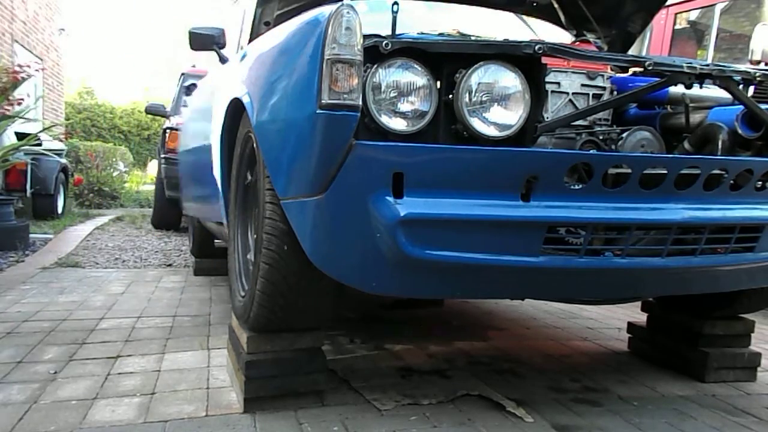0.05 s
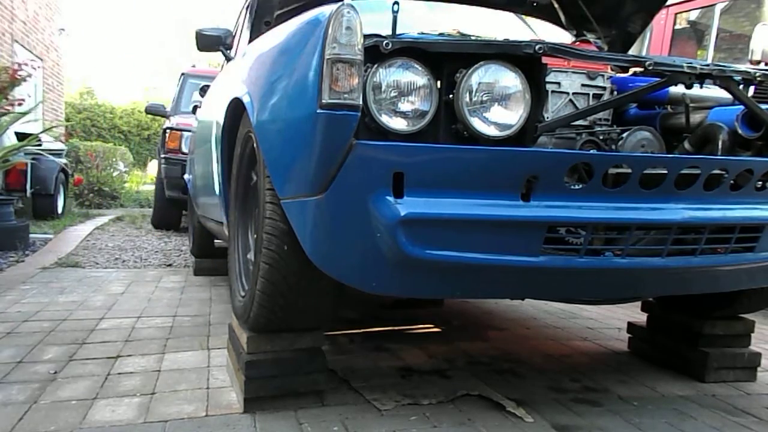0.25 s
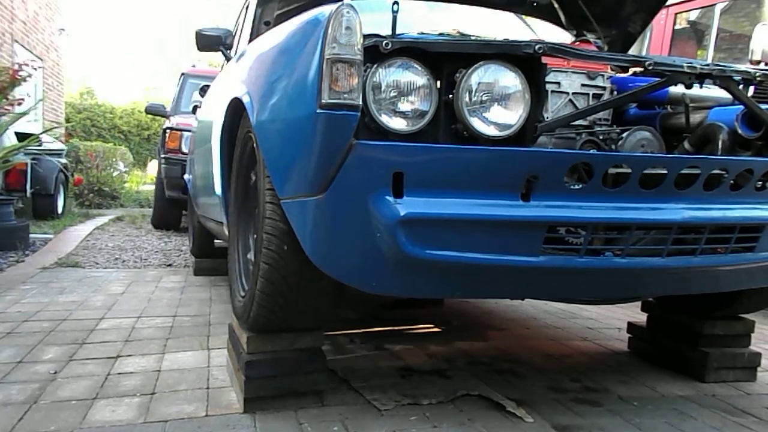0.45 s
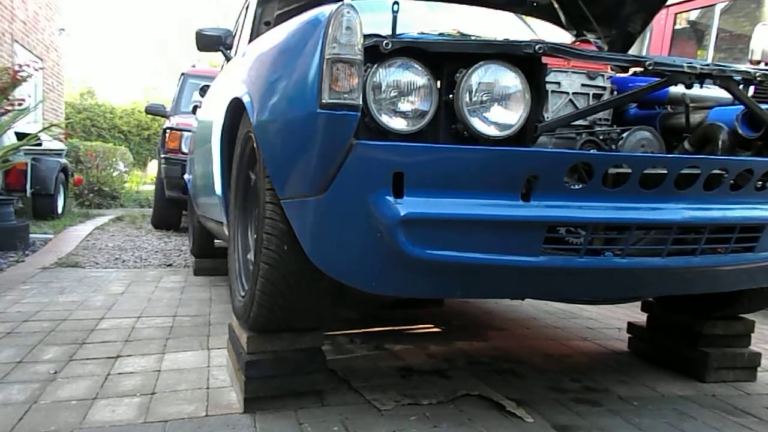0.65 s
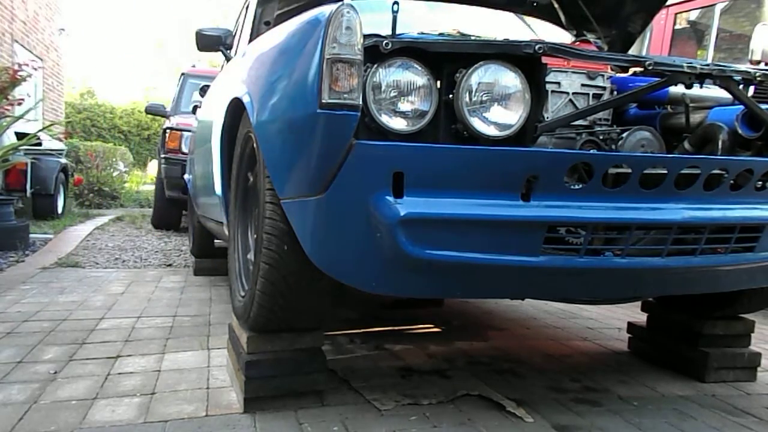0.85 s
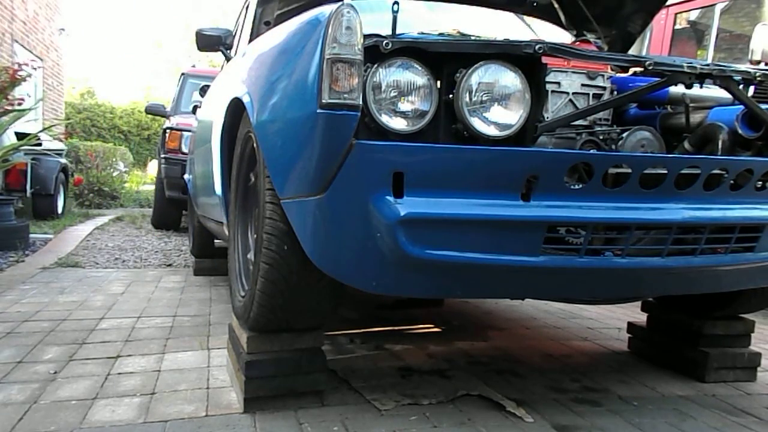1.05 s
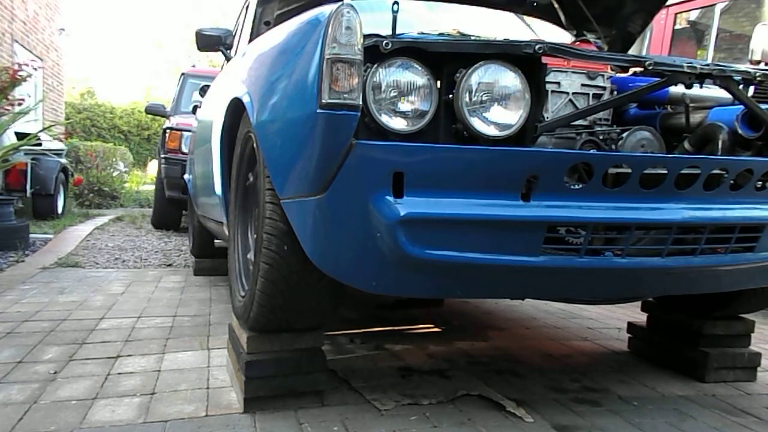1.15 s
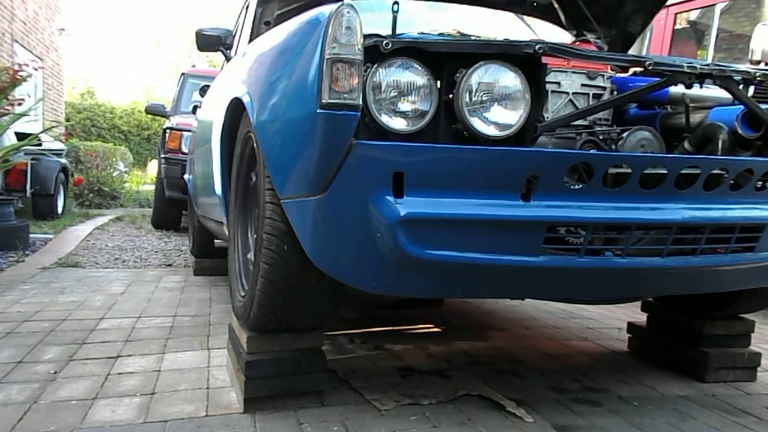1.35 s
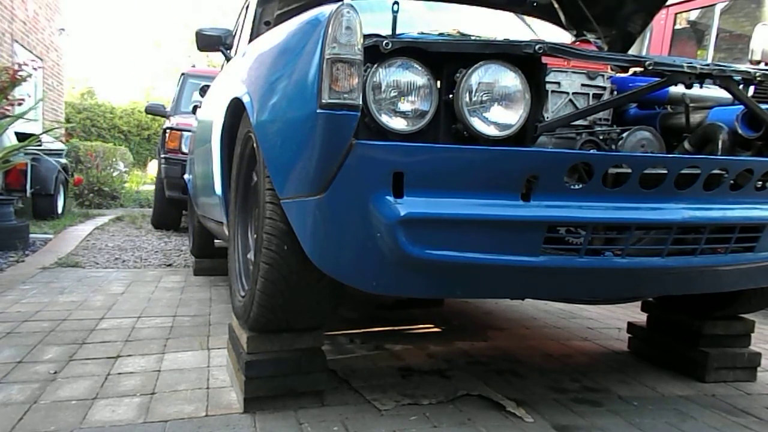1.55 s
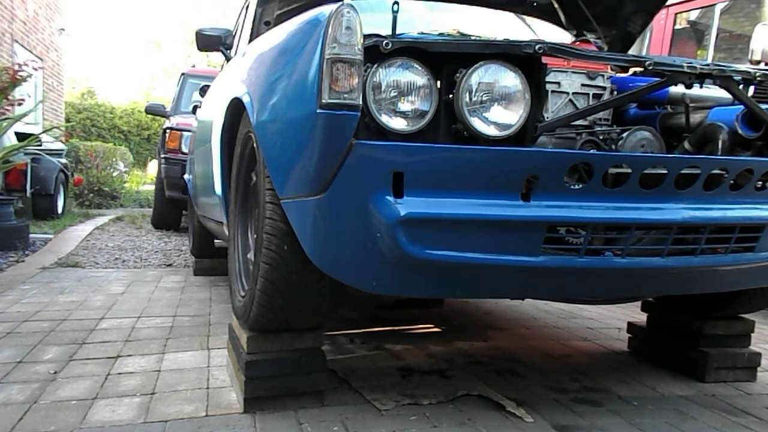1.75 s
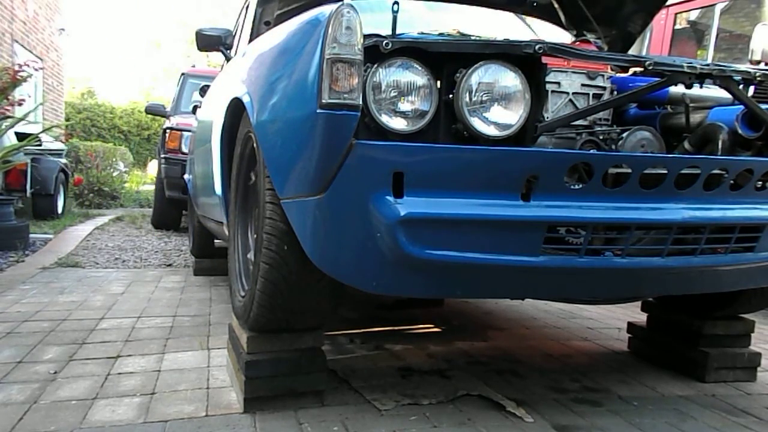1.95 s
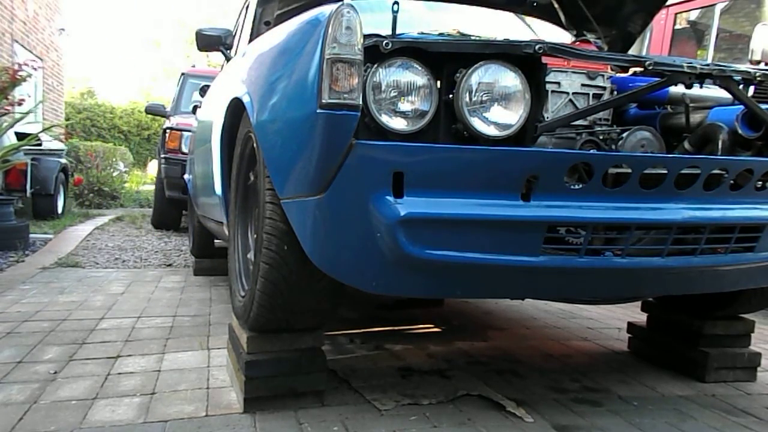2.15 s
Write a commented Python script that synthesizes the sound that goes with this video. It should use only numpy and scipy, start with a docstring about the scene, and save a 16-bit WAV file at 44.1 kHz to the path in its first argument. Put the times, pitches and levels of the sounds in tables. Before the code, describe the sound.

A car door slams a few metres away at about 0.3 seconds: a latch click, a sharp crack and a hollow thump, with a tiny rattle just after. Faint dull knocks follow between 0.6 and 1.3 seconds, with light shoe scuffs on paving and a grittier scuff near 1.9 seconds. Soft outdoor hiss and the low drone of a distant engine, gradually slowing, continue underneath throughout.

```python
"""A car door slams a few metres away on a paved driveway: a click, a crack and a hollow thump.
The latch rides over the striker and its impacts ring the steel frame; the door lands on its seal,
driving the low modes of skin and cabin air, and a loose part rattles briefly.
Faint knocks and shoe scuffs follow, over outdoor hiss and the drone of a distant engine slowing down."""
import sys
import numpy as np
from scipy import signal
from scipy.fft import rfft, irfft
from scipy.io import wavfile

SR = 44100
rng = np.random.default_rng(int(sys.argv[2]) if len(sys.argv) > 2 else 0)


def int16_out(signal):
    """Quantize to a 16-bit WAV file."""
    q = np.round(np.clip(np.atleast_2d(signal).T, -1, 1) * 32767)
    wavfile.write(sys.argv[1], SR, q.astype(np.int16))


N = 97020
TIME = np.arange(N) / SR
RING_TIME = np.arange(SR * 3 // 4) / SR


def amp(db):
    """Amplitude ratio of a level in decibels."""
    return 10 ** (np.asarray(db) / 20)


def unit(x):
    """Normalisation to rms 1."""
    return x / np.sqrt(np.mean(x ** 2) + 1e-20)


def read(points, hz):
    """Interpolation on a logarithmic frequency axis."""
    points_hz, values = np.transpose(points)
    return np.interp(np.log(hz + 1), np.log(points_hz + 1), values)


def add(mix, start_s, sound):
    """Superposition of a delayed sound on the mix."""
    part = mix[round(start_s * SR):][:len(sound)]
    part += sound[:len(part)]


def colour(x, spectrum, tilt_db=0, tilt_from_hz=1240):
    """Spectral shaping to rms 1, with the treble tilted by tilt_db per octave."""
    hz = np.fft.rfftfreq(len(x), 1 / SR)
    octaves = np.log2(np.maximum(hz / tilt_from_hz, 1))
    return unit(irfft(rfft(x) * amp(read(spectrum, hz) + tilt_db * octaves), len(x)))


def drift(rate_hz):
    """Low-pass noise: a slow random wander of rms 1."""
    hz = np.fft.rfftfreq(N, 1 / SR)
    return unit(irfft(rfft(rng.standard_normal(N)) * np.exp(-(hz / rate_hz) ** 2) * (hz > 0), N))


def fade(t60_s):
    """Exponential decay, by 60 dB in t60_s."""
    return np.exp(-np.log(1000) * RING_TIME / t60_s)


def rise(rise_s):
    """Linear attack."""
    return np.minimum(RING_TIME / rise_s, 1)


def click(envelope, spectrum, tilt_db=0):
    """A broadband transient: a noise burst is whitened, then shaped in frequency and time."""
    bins = rfft(rng.standard_normal(len(envelope)) * envelope)
    white = irfft(bins / (abs(bins) + 1e-12), len(envelope))
    burst = colour(white, spectrum, tilt_db) * np.sqrt(envelope)
    return unit(burst) * np.sqrt(np.mean(envelope ** 2))


def dense_ring(spectrum, decay, tilt_db=0):
    """Modal overlap: crowded modes merge into noise, each octave decaying at its own rate."""
    size = len(RING_TIME)
    bins = rfft(colour(rng.standard_normal(size), spectrum, tilt_db))
    octave = np.log2(np.fft.rfftfreq(size, 1 / SR) + 1)
    centres = np.arange(5, 15)
    out = np.zeros(size)
    for centre in centres:
        band = irfft(bins * np.interp(octave, centres, centres == centre), size)
        out += band * fade(read(decay, 2. ** centre))
    return out


def modes(table):
    """Free vibration: each mode is a damped sinusoid."""
    return sum(amp(db) * fade(t60_s) * np.sin(2 * np.pi * hz * RING_TIME) for hz, db, t60_s in table)


# outdoor noise: frequency_hz, density_db
AIR_SPECTRUM = [(12, -23), (33, 5.5), (50, -5), (70, -7.5), (130, -5), (220, -7), (400, -14.5),
                (900, -16.5), (1400, -20), (2500, -24.5), (4500, -25.5), (6500, -27), (11000, -25.5)]
AIR_DB, AIR_SWELL_DB = -47.5, 0.58
def air():
    """Ambient noise: broadband rumble and hiss under slight amplitude modulation."""
    swell = amp(AIR_DB + AIR_SWELL_DB * drift(rate_hz=3.7))
    return swell * colour(rng.standard_normal(N), AIR_SPECTRUM)


# engine speed: time_s, firing_rate_hz
ENGINE_FIRING = [(0, 86.9), (.2, 88.87), (.6, 88.04), (1.0, 86.95), (1.3, 84.4), (1.75, 80.53),
                 (2.2, 74.25)]
# engine loudness: time_s, fundamental_db, overtones_db
ENGINE_LEVELS = [(0, -45.5, -48), (.5, -56.5, -51.5), (0.849, -45.5, -52.5), (1.1, -46, -52.5),
                 (1.32, -37.5, -50), (1.55, -54.5, -49.5), (1.8, -46, -49), (2.0, -43.5, -53.5),
                 (2.2, -52, -47.5)]
# overtones: harmonic_number, relative_db
ENGINE_HARMONICS = [(2, 1), (3, -7)]
WAVER_DB, FIRING_JITTER = 1, 0.004
HUM_HZ, HUM_DB = 63.7, -51.5
def engine():
    """Periodic firing gives harmonics that fall as the far engine slows, beside a hum of steady pitch."""
    firing_hz = np.interp(TIME, *np.transpose(ENGINE_FIRING)) * (1 + FIRING_JITTER * drift(rate_hz=11.3))
    cycles = np.cumsum(firing_hz) / SR
    time_s, fundamental_db, overtones_db = np.transpose(ENGINE_LEVELS)
    level_db = np.interp(TIME, time_s, fundamental_db) + WAVER_DB * drift(rate_hz=3.2)
    out = amp(level_db) * np.sin(2 * np.pi * cycles)
    for harmonic, relative_db in ENGINE_HARMONICS:
        level_db = np.interp(TIME, time_s, overtones_db) + relative_db + WAVER_DB * drift(rate_hz=13)
        out += amp(level_db) * np.sin(2 * np.pi * (harmonic * cycles + rng.random()))
    hum = amp(HUM_DB + WAVER_DB * drift(rate_hz=4.5)) * np.sin(2 * np.pi * HUM_HZ * TIME)
    return out + hum


# sole on paving: centre_s, sigma_s, level_db, tilt_db_per_octave
SHOE_SCUFFS = [(0.881, 0.016, -48.5, -0.5), (1.223, 0.022, -50, -5.5), (1.866, 0.0094, -41.5, 3.5),
               (1.872, 0.096, -51, 0)]
# larger grains snapping: start_s, level_db, tilt_db_per_octave
GRIT_SNAPS = [(1.8418, -35, 6.5), (1.856, -42, 2), (1.8757, -43, 2), (1.8885, -32.5, 0),
              (1.8930, -38, -2.5)]
# crunching grit: frequency_hz, density_db
GRIT_SPECTRUM = [(100, -8), (400, 9.5), (1300, -3), (2600, 5.5), (4500, 0.5), (6500, 4), (11000, -2.5),
                 (14000, -35)]
GRAINS_PER_S, GRAIN_SPREAD_DB = 5000, 0.5
def scuffs():
    """Shot noise: grit crunches in random impulses as a sole's pressure swells and fades."""
    grains = rng.standard_normal(N) * amp(GRAIN_SPREAD_DB * np.minimum(rng.exponential(1, N), 4))
    grains *= rng.random(N) < GRAINS_PER_S / SR
    out = np.zeros(N)
    for centre_s, sigma_s, level_db, tilt_db in SHOE_SCUFFS:
        pressure = np.exp(-.5 * ((TIME - centre_s) / sigma_s) ** 2)
        out += amp(level_db) * pressure * colour(grains, GRIT_SPECTRUM, tilt_db)
    snap_envelope = rise(0.00076) * fade(t60_s=0.033)
    for start_s, level_db, tilt_db in GRIT_SNAPS:
        add(out, start_s, amp(level_db) * click(snap_envelope, GRIT_SPECTRUM, tilt_db))
    return out


# dull knocks close by: start_s, level_db, pitch_hz, tick_relative_db, tilt_db_per_octave
SMALL_KNOCKS = [(0.1909, -35, 467, 1, 2), (0.6245, -31.5, 463, -4, -1), (0.7667, -33, 397.6, -1.5, 4.5),
                (1.1749, -32, 148, -7, -6), (1.178, -30.5, 400, -3.5, -8), (1.1980, -43, 616, 1, -8),
                (1.3065, -36, 410, 3, -1.5)]
# contact tick: frequency_hz, density_db
TICK_SPECTRUM = [(100, -3), (400, 9.5), (1500, 0), (3500, -10), (5500, -10), (11000, -11)]
KNOCK_T60_CYCLES = 7.2
def knocks():
    """Impact excitation: each contact gives a tick and one heavily damped mode."""
    out = np.zeros(N)
    for start_s, level_db, pitch_hz, tick_db, tilt_db in SMALL_KNOCKS:
        tick = amp(tick_db) * click(fade(t60_s=0.012), TICK_SPECTRUM, tilt_db)
        body = modes([(pitch_hz, 0, KNOCK_T60_CYCLES / pitch_hz)])
        add(out, start_s, amp(level_db) * (tick - body))
    return out


# contacts of a loose part: start_s, level_db
RATTLE_HITS = [(0.3943, -39.5), (0.4000, -38), (0.4040, -48), (0.425, -54)]
# its ring: frequency_hz, density_db
RATTLE_SPECTRUM = [(200, -35), (1000, -6), (2400, 3), (3800, 3.5), (5500, -7.5), (11000, -5)]
# its damping: frequency_hz, t60_s
RATTLE_DECAY = [(1000, 0.035), (4000, 0.08), (11000, 0.13)]
def rattle():
    """Intermittent contact: a loose part chatters as the door settles."""
    out = np.zeros(N)
    for start_s, level_db in RATTLE_HITS:
        add(out, start_s, amp(level_db) * dense_ring(RATTLE_SPECTRUM, RATTLE_DECAY))
    return out


# squeezed rubber seal: frequency_hz, density_db
SEAL_SPECTRUM = [(60, -27), (150, -10), (290, -2), (420, -14.5), (700, -11), (1100, -10.5), (1800, -16),
                 (8000, -19)]
SEAL_START_S, SEAL_DB = 0.224, -24
def seal():
    """Compliant contact: the rubber spreads the door's force in time, giving a soft, hollow push."""
    out = np.zeros(N)
    add(out, SEAL_START_S, amp(SEAL_DB) * click(rise(0.014) * fade(t60_s=0.28), SEAL_SPECTRUM))
    return out


# the door lands on its seal and rebounds: start_s, level_db
DOOR_LANDINGS = [(0.2905, -20), (0.3074, -26), (0.3250, -33)]
# door skin and cabin air: frequency_hz, relative_db, t60_s
BODY_MODES = [(85, -13.5, 0.38), (104.2, -4, 0.27), (118.6, -3, .15), (137.8, -16, 0.78),
              (172.4, -12, 0.27), (221, -12.5, 0.49), (318.2, -8, 0.27), (517, -13.5, 0.25),
              (776, -14.5, 0.15)]
# dense panel vibration: frequency_hz, density_db
BOOM_SPECTRUM = [(25, -30), (60, -22), (110, 0.5), (200, -3), (450, -7), (700, -4.5), (1200, -21.5),
                 (3000, -13), (11000, -37)]
# panel damping: frequency_hz, t60_s
BOOM_DECAY = [(60, 0.36), (300, 0.33), (700, 0.23), (3000, 0.089)]
BOOM_RELATIVE_DB = -5.5
def thump():
    """Panel and cavity resonance: each landing sets the door skin and cabin air booming."""
    out = np.zeros(N)
    for start_s, level_db in DOOR_LANDINGS:
        boom = amp(BOOM_RELATIVE_DB) * dense_ring(BOOM_SPECTRUM, BOOM_DECAY)
        add(out, start_s, amp(level_db) * rise(0.0042) * (boom - modes(BODY_MODES)))
    return out


# latch on striker: start_s, crack_db, ring_db, tilt_db_per_octave
LATCH_CONTACTS = [(0.2194, -24.5, -31.5, 2), (0.2352, -23.5, -42, 8), (0.2640, -16, -19.5, 0),
                  (0.2750, -27, -31, -3), (0.2843, -25, -37, 1.5), (0.2930, -28.5, -44, 2.5),
                  (0.3250, -34, -50, -6)]
# steel of latch and frame: frequency_hz, density_db
STEEL_SPECTRUM = [(40, -38), (90, -16), (150, -4), (280, -1.5), (480, 2), (750, 0.5), (1100, 5.5),
                  (1400, 0.5), (2200, 0.5), (3200, 0.5), (4600, 0.5), (6000, -6.5), (11000, -3),
                  (14000, -38)]
# its damping: frequency_hz, t60_s
STEEL_DECAY = [(100, 0.21), (400, 0.38), (1000, 0.22), (3000, 0.18), (6000, 0.23), (11000, .15)]
# distinct resonances of the frame: frequency_hz, relative_db, t60_s
DOOR_FRAME_MODES = [(1064, 2, 0.15), (1110, -4, 0.22), (1440, 0, 0.16), (1631, 3.5, 0.17),
                    (2024, -14, 0.55), (2610, -3, 0.13), (2820, -7, 0.21), (3360, -11, 0.46),
                    (3580, -2, 0.14), (3763, -25, 2.8), (3946, -20.5, 5.3), (4030, -3, 0.21),
                    (4680, -5, 0.14), (4990, -27, 0.36)]
CRACK_HOLD_S, CRACK_T60_S, FRAME_RELATIVE_DB = 0.004, 0.044, -19.5
def latch():
    """Hard contact: each brief steel impact gives a broadband crack and leaves the frame ringing."""
    out = np.zeros(N)
    crack_envelope = np.minimum(1, amp(-60 * (RING_TIME - CRACK_HOLD_S) / CRACK_T60_S))
    for start_s, crack_db, ring_db, tilt_db in LATCH_CONTACTS:
        crack = click(crack_envelope, STEEL_SPECTRUM, tilt_db)
        frame = sum(rng.choice([-1, 1]) * modes([mode]) for mode in DOOR_FRAME_MODES)  # random polarity
        ring = dense_ring(STEEL_SPECTRUM, STEEL_DECAY, tilt_db) + amp(FRAME_RELATIVE_DB) * frame
        add(out, start_s, rise(0.002) * (amp(crack_db) * crack + amp(ring_db) * ring))
    return out


def scene():
    """Linear superposition of the slam and its quiet surroundings, in mono."""
    return (latch() + seal() + thump() + rattle() + knocks() + scuffs() + engine() + air())[None]


# recorder response: frequency_hz, gain_db
RECORDER_RESPONSE = [(20, 2), (4000, 2), (5000, -1.5), (6000, -5.5), (6700, -14.5), (7600, -16),
                     (9300, -20.5), (10800, -15), (11400, -20.5), (11900, -43)]
# narrow treble notches: centre_hz
RECORDER_NOTCHES = [7000, 8520, 10020]
NOTCH_WIDTH_HZ, LOW_CUT_HZ, HIGH_CUT_HZ = 300, 52.5, 12100
def record(dry):
    """The recorder's linear filtering thins the bass, dulls the treble and cuts narrow notches in it."""
    hz = np.fft.rfftfreq(2 * N, 1 / SR)
    gain = amp(read(RECORDER_RESPONSE, hz))
    for centre_hz in RECORDER_NOTCHES:
        gain *= np.tanh(abs(hz - centre_hz) / NOTCH_WIDTH_HZ)
    heard = irfft(rfft(dry, 2 * N) * gain)[:, :N]
    high_pass = signal.butter(2, LOW_CUT_HZ, "high", fs=SR, output="sos")
    low_pass = signal.firwin(511, HIGH_CUT_HZ, window=("kaiser", 9), fs=SR)
    return signal.oaconvolve(signal.sosfilt(high_pass, heard), low_pass[None], "same")


dry = scene()
out = record(dry)
int16_out(out)
```